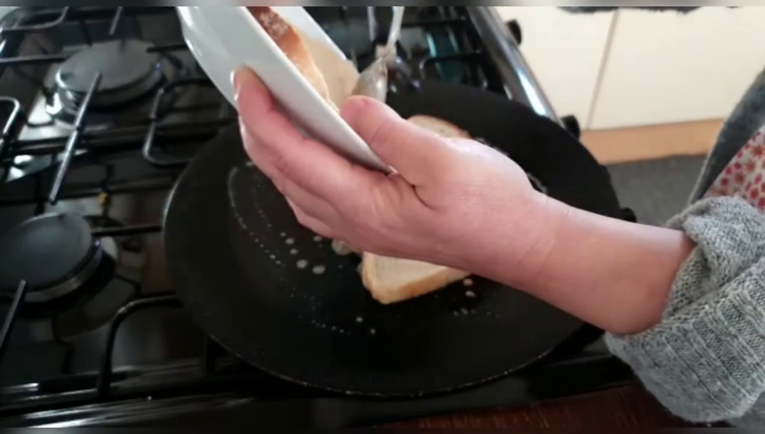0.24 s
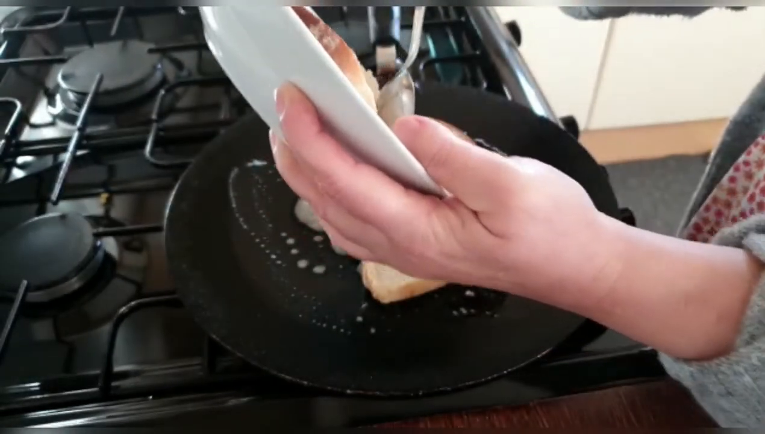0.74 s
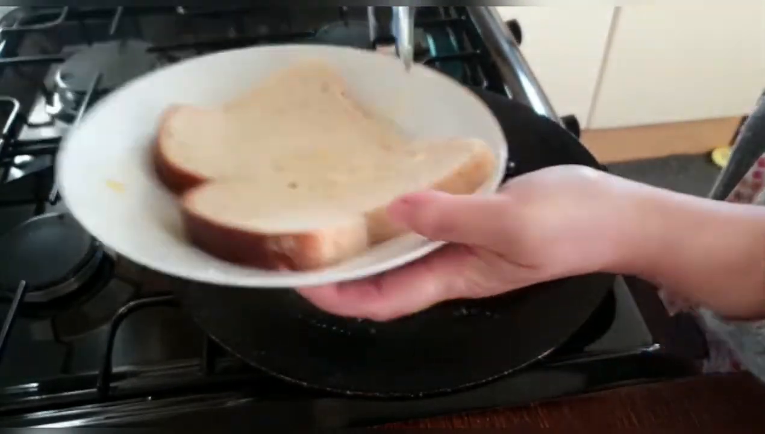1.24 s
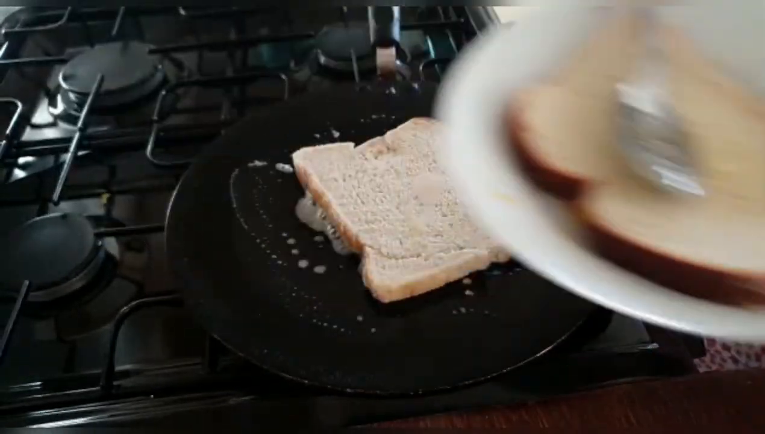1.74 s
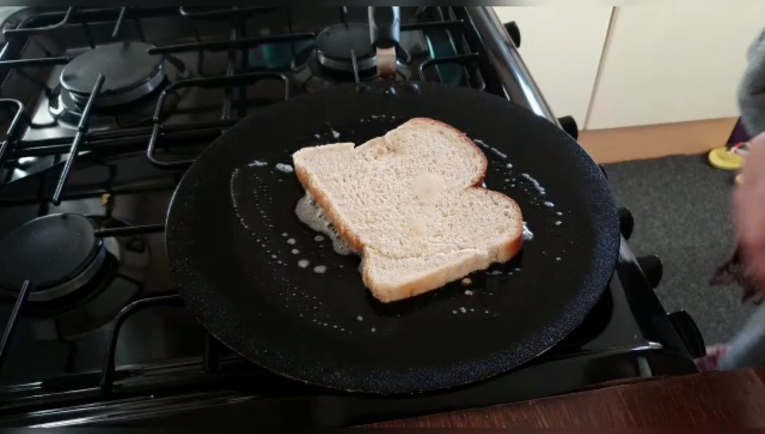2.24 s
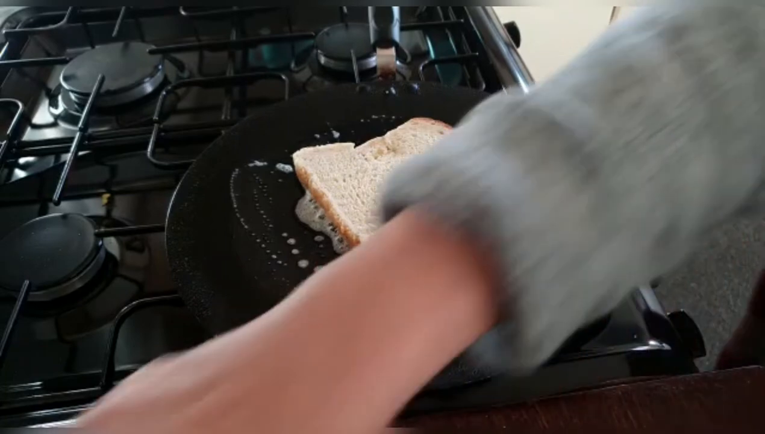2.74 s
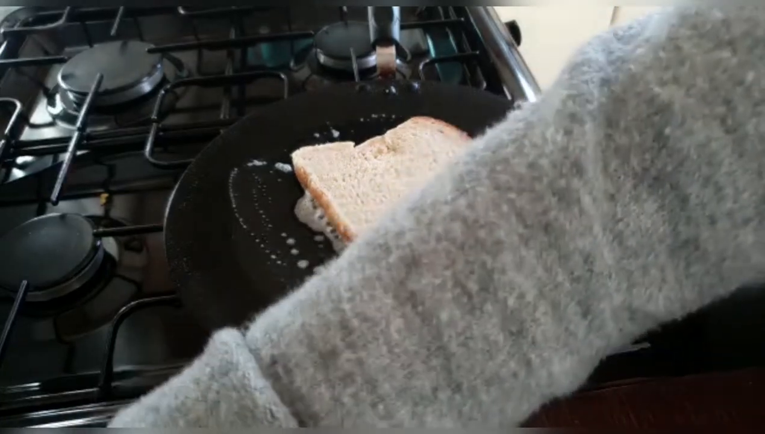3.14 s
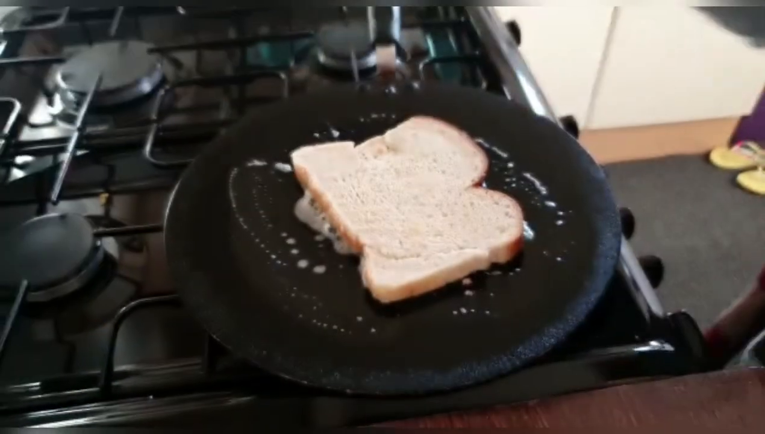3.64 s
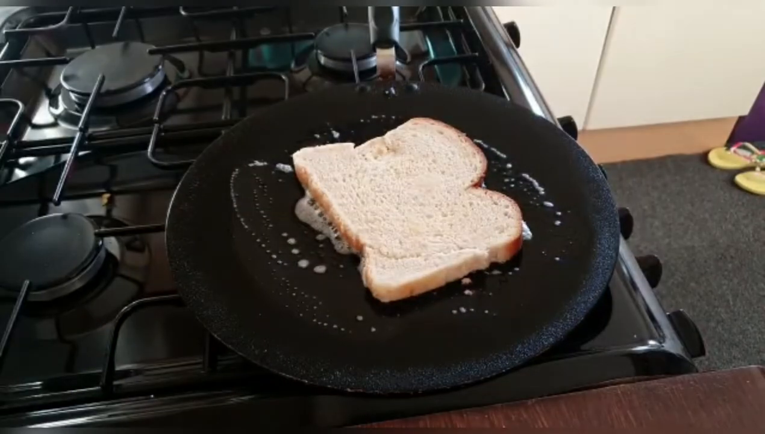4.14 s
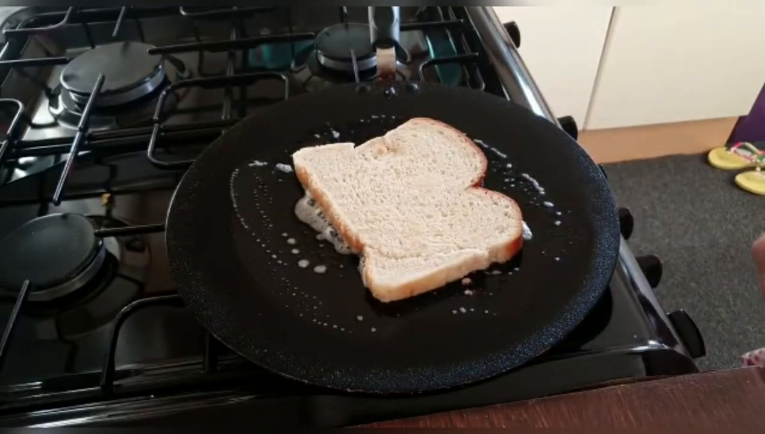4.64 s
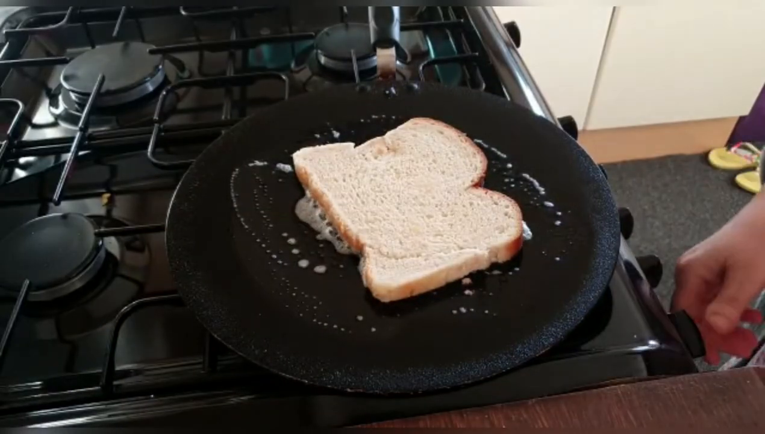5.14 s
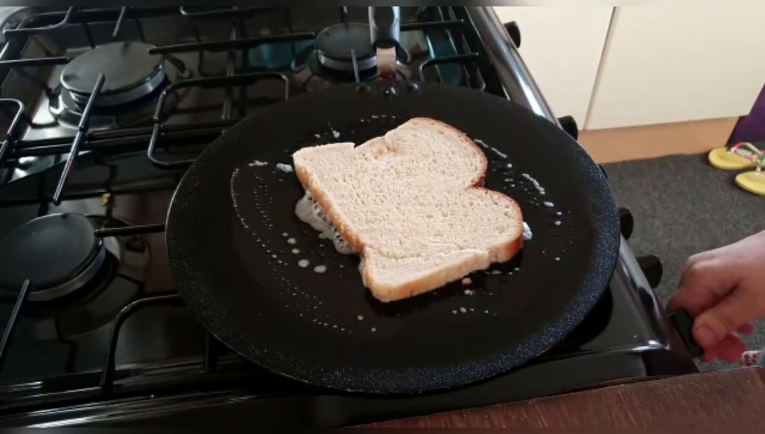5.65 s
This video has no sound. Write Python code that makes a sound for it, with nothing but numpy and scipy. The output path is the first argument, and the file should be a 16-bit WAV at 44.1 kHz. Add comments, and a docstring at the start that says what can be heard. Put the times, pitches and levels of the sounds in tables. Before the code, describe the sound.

A spoon clinks on a china plate, then a kitchen drawer knocks open, rolls and knocks shut, over a softly hissing gas burner and spitting fat.

```python
"""A kitchen drawer knocks open, rumbles out and back on its rollers and knocks shut, its panels ringing.
Just before, a china plate is set on the worktop and the metal spoon on it clinks; the first knock jolts
the spoon again. Off to the left a gas burner hisses and fat spits in a frying pan. Behind it all, a
humming fridge and a low rumble. Heard from within the room on a stereo pair of microphones, with a
gain control that dips after the knocks."""
import sys
import numpy as np
from scipy import signal
from scipy.fft import rfft, irfft
from scipy.io import wavfile
from scipy.ndimage import uniform_filter1d

SR = 44100
rng = np.random.default_rng(int(sys.argv[2]) if len(sys.argv) > 2 else 0)


def unload_wav(signal):
    """Save mono or channel-first audio to the path in sys.argv[1] as 16-bit WAV at rate SR, clipped to [-1, 1]."""
    wavfile.write(
        sys.argv[1],
        SR,
        np.round(np.clip(np.atleast_2d(signal).T, -1, 1) * 32767).astype(np.int16),
    )


N = 259831


# the drawer meets its stops, open then shut: t/s, force/dB, crack/dB, rattle/dB
DRAWER_STOPS = [(2.5090, -14.5, -4, -15), (3.1147, -13.7, 1.8, -16.8)]
# drawer and cabinet modes: f/Hz, t60/s, level opening/dB, level shutting/dB, L-R/dB
CABINET_MODES = [(118, 0.26, 5, 3.5, 2), (165.8, 0.34, -12.5, -12, 2), (290.2, 0.26, -10.5, -7, -2.5),
                 (389, 0.22, -31, -15.5, 5), (463, .2, -12.5, -16.5, 4), (509, .16, -9, -12, -2),
                 (567, 0.16, -4.5, -1, -1), (634.5, 0.13, -2.5, -9, 0), (788, 0.11, -16, 1.5, 13),
                 (926, 0.16, -4.5, -14, 6), (1025, 0.16, -6.5, -19, 5), (1103, 0.095, -9.5, -4.5, 7),
                 (1255, 0.063, -23, -14, -4), (1460, 0.072, -5.5, -8, 5), (1677, 0.06, -13, -7.5, 9),
                 (1870, .08, -24, -9.5, -2), (2040, 0.059, -28, -6, 5)]
# dense resonances of panels and contents: f/Hz, relative level opening/dB, shutting/dB, L-R/dB
PANEL_SPECTRUM = [(40, -20, -14, 0), (110, -8, -1, -1), (231, -1, 0, 1), (382, -10.5, -5.5, -3),
                  (527, 4.5, 5, 1.5), (800, 1, 3.5, 6), (1150, -2, -4.5, 6), (1560, -5.5, -3.5, 3),
                  (2000, -16.5, -6.5, 4), (2570, -17.5, -13.5, 3), (3370, -19, -17.5, 4.5),
                  (5000, -28.5, -31.5, 7.5), (7100, -32.5, -39, 7), (9100, -27, -35, 7),
                  (11500, -31, -44, -3)]
def drawer_knocks():
    """Each stop sends a crack through the panels, rings the cabinet and shakes the loose parts."""
    modes, clatter, t = np.zeros((2, N)), np.zeros((2, N)), np.arange(SR) / SR
    shake = (1 - np.exp(-t / 0.002)) * (amp(0.5 - 60 * t / 0.056) + amp(-3.5 - 60 * t / 0.32))
    for stop, (start, force_db, crack_db, rattle_db) in enumerate(DRAWER_STOPS):
        def panels(hz):
            return read_gain(PANEL_SPECTRUM, hz, stop + 1) * sides(read(PANEL_SPECTRUM, hz, column=3))
        crack = bending_wave(lambda hz: panels(hz) * contact(hz, corner_hz=6500, order=1), lag_s=.0018)
        add(clatter, start - .0005, amp(crack_db) * crack)
        rattle = noise(lambda hz: panels(hz) * contact(hz, corner_hz=3500, order=1), size=SR)
        add(clatter, start, amp(rattle_db) * rattle * shake)
        for m, (hz, t60, *stop_db, pan_db) in enumerate(CABINET_MODES):
            gain = (-1) ** m * amp(force_db + stop_db[stop])  # neighbouring modes swing opposite ways
            add(modes, start, gain * sides(pan_db) * ring(hz, t60, rise_cycles=0.82))
    left, right = kitchen(modes, wet_db=-8.5) + kitchen(clatter, wet_db=-3)
    return np.array([left, np.roll(right, 5)])  # the far microphone hears it 5 samples later


# the drawer slides out, then back in: t/s, length/s, level/dB, fade/(dB per s)
DRAWER_SLIDES = [(2.635, .275, -32.7, 27), (2.919, .15, -33.3, 17)]
# rollers on the runners: f/Hz, relative level/dB
ROLLER_SPECTRUM = [(40, -14), (120, 1.5), (200, -5.5), (320, 2.5), (700, -4), (1150, -15.5), (1620, -11.5),
                   (1950, -21.5), (5000, -41.5)]
def drawer_rollers():
    """Just left of centre, the rollers rumble unevenly, fading as each shove loses speed."""
    t = np.arange(N) / SR
    speed = np.zeros(N)
    for start, length, db, fade in DRAWER_SLIDES:
        shove = stroke(start, length, rise_s=0.011, fall_s=0.059)
        speed += shove * amp(db - fade * np.maximum(t - start, 0))
    rumble = noise(lambda hz: read_gain(ROLLER_SPECTRUM, hz))
    uneven = amp(1.8 * drift(rate_hz=41))
    return kitchen(sides(2.5) * speed * uneven * rumble, wet_db=-6)


# the spoon bounces on the plate: t/s, plate/dB, spoon/dB, t60 factor, f/Hz favoured at that spot
SPOON_BOUNCES = [(1.8743, -43, -48, .48, 2800), (1.8800, -49, -36.5, .48, 4350),
                 (1.9060, -51, -60, .55, 4450), (2.5125, -40.5, -36.5, 1.05, 6800),
                 (2.5350, -44, -44, 1.1, 3200), (2.552, -45, -44, 1.1, 2200)]
# modes of the china plate and of the metal spoon: f/Hz, level/dB, t60/s, L-R/dB
PLATE_MODES = [(1470, -10, .12, 4), (2330, -3.5, .12, -1), (2332, -2.5, 0.2, 1), (3275, -3, 0.13, 1),
               (3306, -1.5, .24, 6), (4380, -5, 0.18, 2), (4444, -7.5, .22, 8), (5590, -10, 0.18, 15),
               (5640, -12, 0.21, 7), (7000, -15.5, .22, 8)]
SPOON_MODES = [(8300, -7.5, 0.069, 14), (8520, -7.5, 0.1, 15), (10070, 0.5, 0.056, -2),
               (10130, -9.5, 0.19, -2), (10800, -13, .12, -5)]
def plate_and_spoon():
    """China and spoon ring together, coloured by where the spoon lands; the worktop booms below."""
    spot_boost_db, spot_octaves = 9, .3
    out, t = np.zeros((2, N)), np.arange(SR) / SR
    for start, plate_db, spoon_db, t60_factor, spot_hz in SPOON_BOUNCES:
        for modes, db in ((PLATE_MODES, plate_db), (SPOON_MODES, spoon_db)):
            for hz, mode_db, t60, pan_db in modes:
                spot_db = spot_boost_db * np.exp(-(np.log2(hz / spot_hz) / spot_octaves) ** 2)
                tone = ring(hz, t60 * t60_factor, rise_cycles=1)
                add(out, start, amp(db + mode_db + spot_db) * sides(pan_db) * tone)
    boom = amp(-31) * ring(hz=50.5, t60=0.24, rise_cycles=.6)
    add(out, start=1.8945, sound=sides(0) * boom)
    scuff = noise(lambda hz: contact(hz, corner_hz=3520, order=2), size=SR) * amp(-40 - 60 * t / 0.097)
    add(out, SPOON_BOUNCES[0][0], sides(2.8) * scuff)  # the foot ring scuffs the worktop
    return kitchen(out, wet_db=-5.5)


# the louder spits from the pan: t/s, level/dB, L-R/dB
FAT_SPITS = [(.3108, -34, 6), (1.0578, -33, 8), (1.978, -35, 5), (2.6188, -32, 7), (3.3465, -34.5, 10),
             (4.067, -36, 2), (4.3692, -21, 4)]
# one spit: f/Hz, relative level/dB
SPIT_SPECTRUM = [(200, -19), (1500, -12), (4000, -8), (6500, -9), (8500, -1), (10300, 0), (12000, -4)]
def spitting_fat():
    """Droplets burst in the pan to the left, each a snap and a short splash; many are tiny."""
    tiny_spits = rng.uniform((0, -56, 0), (N / SR, -43, 8), (24, 3))  # columns as in FAT_SPITS
    snap = bending_wave(lambda hz: read_gain(SPIT_SPECTRUM, hz), lag_s=0.000803)
    out, t = np.zeros((2, N)), np.arange(len(snap)) / SR
    for start, db, pan_db in FAT_SPITS + list(tiny_spits):
        splash = noise(lambda hz: read_gain(SPIT_SPECTRUM, hz), size=len(t)) * amp(-9.5 - 60 * t / 0.039)
        add(out, start, amp(db) * sides(pan_db) * (snap + splash))
    return kitchen(out, wet_db=-8)


# flame and room tone at the microphones: f/Hz, relative level/dB, L-R/dB
FLAME_SPECTRUM = [(20, -14, 2), (117, 6, 1.5), (197, -7.5, -1), (257, -0.5, -0.5), (422, -5.5, -1),
                  (796, -4.5, 1.5), (1096, -11.5, 3.5), (1427, -7, 0.5), (1950, -18.5, 8), (3260, -15.5, 7),
                  (4970, -17, 7), (5640, -23.5, 9.5), (7730, -25.5, 9.5), (8060, -20, 14.5), (9300, -17, 8),
                  (10320, -10.5, 2.5), (11580, -26, -2)]
# whistles of the gas jet: f/Hz, width/Hz, relative level/dB
JET_WHISTLES = [(3870, 105, .7), (4045, 95, .7), (1440, 240, -3.3), (3270, 240, -4.7), (2490, 110, -7),
                (5050, 100, -5), (4740, 150, -8.5)]
def gas_burner():
    """On the left the flame murmurs and hisses; the jet whistles, louder once the knob is turned."""
    turn_at_s, turn_takes_s, turn_up_db = 4.57, .06, 2.5
    flame = noise(lambda hz: read_gain(FLAME_SPECTRUM, hz) * sides(read(FLAME_SPECTRUM, hz, column=2)))
    whistle = noise(lambda hz: sum(amp(db) / (1 + (2 * (hz - centre) / width) ** 2)
                                   for centre, width, db in JET_WHISTLES))
    knob = np.clip((np.arange(N) / SR - turn_at_s) / turn_takes_s, 0, 1)
    jet_db = -60.8 + turn_up_db * knob + 1.7 * drift(rate_hz=12)
    flicker_db = 0.34 * drift(rate_hz=16)
    return amp(-47 + flicker_db) * flame + amp(jet_db) * sides(8) * whistle


# lines of the fridge's hum: f/Hz, level/dB, L-R/dB
HUM_LINES = [(50.5, -52.5, 0), (100.5, -49.5, .5), (169, -67, 15), (296.3, -61, -2.5), (351.5, -63.5, -1),
             (549.3, -58.5, 3), (651, -67, -11.5), (899, -68.5, 5)]
def fridge():
    """Mains hum in the background, each line wavering a little in level and phase."""
    out, t = np.zeros((2, N)), np.arange(N) / SR
    for hz, db, pan_db in HUM_LINES:
        level = amp(db + 1.73 * drift(rate_hz=2.3))
        phase = 2 * np.pi * (hz * t + rng.random()) + 0.31 * drift(rate_hz=1.6)
        out += np.sqrt(2) * sides(pan_db) * level * np.sin(phase)
    return out


# the room's low drone swells: t/s, length/s, level/dB
DRONE_SWELLS = [(.39, .39, -41), (2.55, .45, -46), (4.722, 1.3, -44)]
def room_rumble():
    """A low rumble lies under everything and now and then swells into a wavering drone."""
    rumble = noise(lambda hz: 1 / (1 + ((hz - 50) / 9) ** 4))
    drone_hz = 49.5 + 3 * drift(rate_hz=5)
    drone = np.sqrt(2) * np.sin(2 * np.pi * np.cumsum(drone_hz) / SR)
    swell = sum(amp(db) * stroke(start, length, rise_s=0.098, fall_s=0.16)
                for start, length, db in DRONE_SWELLS)
    return amp(-49) * rumble + swell * amp(1.5 * drift(rate_hz=4)) * drone


# reverberation of the kitchen: f/Hz, t60/s
KITCHEN_DECAY = [(100, 0.56), (400, 0.46), (1000, 0.46), (2500, 0.43), (6000, 0.45), (11000, 0.26)]
def kitchen(direct, wet_db, gap_s=0.0055):
    """The direct sound, then sparse reflections from the room, each band dying at its own speed."""
    size, reflections_per_s = SR * 3 // 4, 4000
    taps = rng.choice([-1., 1.], (2, size)) * (rng.random((2, size)) < reflections_per_s / SR)
    hz, t, bands = signal.stft(taps, SR, nperseg=256)
    decay = amp(-60 * t / read(KITCHEN_DECAY, hz)[:, None])
    tail = signal.istft(bands * decay, SR, nperseg=256)[1]
    tail *= np.clip(np.arange(tail.shape[1]) / SR / gap_s - .5, 0, 1)
    tail /= np.linalg.norm(tail, axis=1, keepdims=True)
    tail = signal.sosfilt(signal.butter(2, 260, "high", fs=SR, output="sos"), tail)  # bass stays direct
    return direct + amp(wet_db) * signal.fftconvolve(direct, tail, axes=1)[:, :N]


# how alike the two microphones hear a noise: f/Hz, correlation
MIC_CORRELATION = [(60, 0.99), (130, 0.97), (270, 0.74), (570, 0.39), (1200, 0)]
def noise(colour, size=N):
    """Stereo noise of rms 1 shaped by colour(hz); the microphones agree in the bass only."""
    hz = np.fft.rfftfreq(size, 1 / SR)
    left, other = rfft(rng.standard_normal((2, size)))
    alike = np.clip(read(MIC_CORRELATION, hz), -1, 1)
    right = alike * left + np.sqrt(1 - alike ** 2) * other
    return unit(irfft(np.array([left, right]) * colour(hz), size))


def ring(hz, t60, rise_cycles):
    """One mode: it swells over a cycle or so, then dies away."""
    t = np.arange(SR) / SR
    swell = 1 - np.exp(-(t * hz / rise_cycles) ** 2)
    return swell * amp(-60 * t / t60) * np.sin(2 * np.pi * hz * t)


def bending_wave(colour, lag_s, size=4096):
    """A click of peak 1 that has crossed a panel: 1 kHz takes lag_s, lower tones take longer."""
    hz = np.fft.rfftfreq(size, 1 / SR)
    turns = 2 * lag_s * np.sqrt(1000 * hz)
    wave = irfft(colour(hz) * np.exp(-2j * np.pi * turns), size)
    return wave / np.max(np.abs(wave))


def contact(hz, corner_hz, order):
    """A blow of finite length excites little above its corner."""
    return 1 / np.sqrt(1 + (hz / corner_hz) ** (2 * order))


def stroke(start, length, rise_s, fall_s):
    """An envelope that rises from start, holds, and falls away after length seconds."""
    t = np.arange(N) / SR - start
    return np.clip(t / rise_s, 0, 1) * np.clip(1 - (t - length) / fall_s, 0, 1)


def drift(rate_hz):
    """A slow random curve of rms 1."""
    hz = np.fft.rfftfreq(N, 1 / SR)
    return unit(irfft(rfft(rng.standard_normal(N)) * np.exp(-(hz / rate_hz) ** 2), N))


def amp(db):
    """Decibels to gain."""
    return 10 ** (np.asarray(db) / 20)


def unit(x):
    """Scales to rms 1."""
    return x / np.sqrt(np.mean(x ** 2) + 1e-20)


def read(table, hz, column=1):
    """One column of a table, interpolated over log frequency."""
    table = np.array(table, float)
    return np.interp(np.log(hz + 1), np.log(table[:, 0] + 1), table[:, column])


def read_gain(table, hz, column=1):
    """A spectrum table as gain."""
    return amp(read(table, hz, column))


def sides(pan_db):
    """Gains at the left and right microphone; positive pan_db is to the left."""
    return amp(np.array([[.5], [-.5]]) * pan_db)


def add(mix, start, sound):
    """Mixes a stereo sound in at start seconds."""
    part = mix[:, round(start * SR):][:, :sound.shape[1]]
    part += sound[:, :part.shape[1]]


def scene():
    """The kitchen as it reaches the microphones."""
    foreground = drawer_knocks() + drawer_rollers() + plate_and_spoon()
    return foreground + spitting_fat() + gas_burner() + fridge() + room_rumble()


def record(dry):
    """The recorder's gain dips after the knocks and recovers slowly; then clipping and a band limit."""
    threshold_db, max_dip_db, recovery_db_per_s, lag_s, band_limit_hz = -15, 4.5, 2.92, 0.084, 11820
    power_db = 10 * np.log10(abs(uniform_filter1d((dry ** 2).mean(0), 400)) + 1e-12)
    over_db = np.clip(power_db - threshold_db, 0, max_dip_db)
    recovery_db = recovery_db_per_s * np.arange(N) / SR
    dip_db = np.maximum.accumulate(over_db + recovery_db) - recovery_db
    pole = np.exp(-1 / (lag_s * SR))  # the gain takes a moment to fall
    ducked = dry * amp(-signal.lfilter([1 - pole], [1, -pole], dip_db))
    lowpass = signal.firwin(301, band_limit_hz, window=("kaiser", 8), fs=SR)
    return signal.oaconvolve(np.clip(ducked, -1, 1), lowpass[None], "same")


dry = scene()
out = record(dry)
unload_wav(out)
```